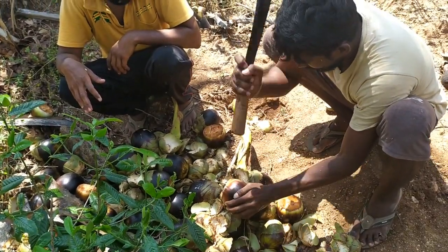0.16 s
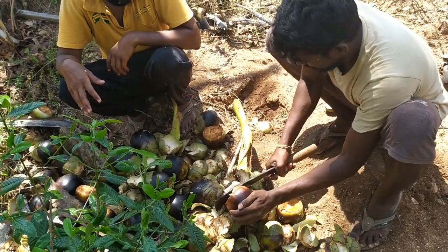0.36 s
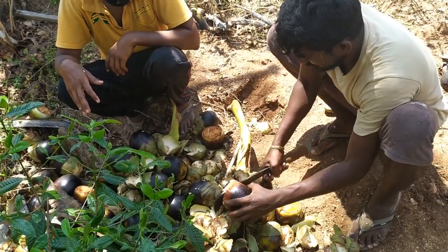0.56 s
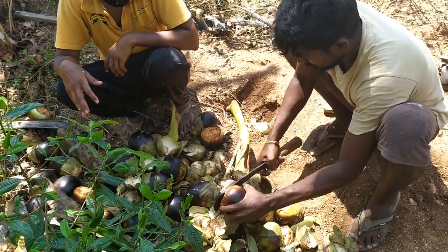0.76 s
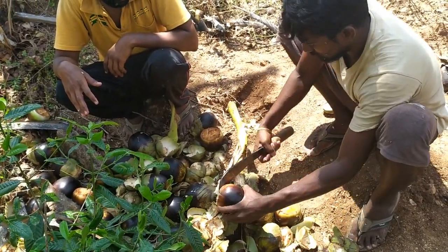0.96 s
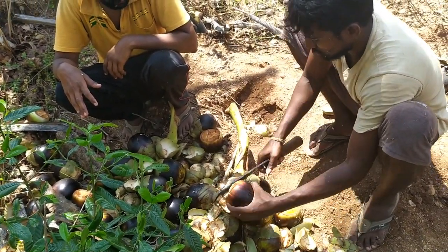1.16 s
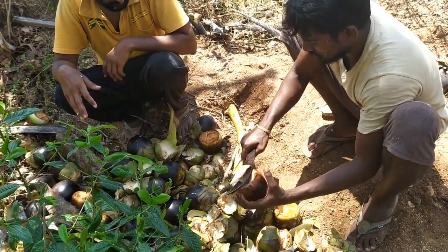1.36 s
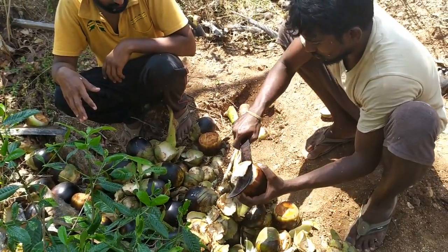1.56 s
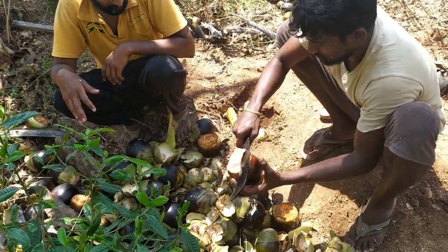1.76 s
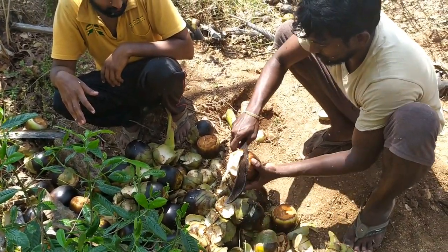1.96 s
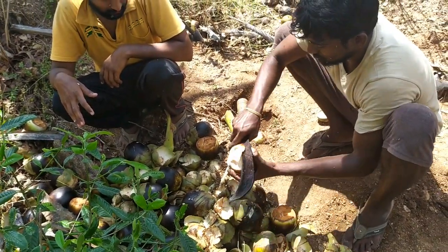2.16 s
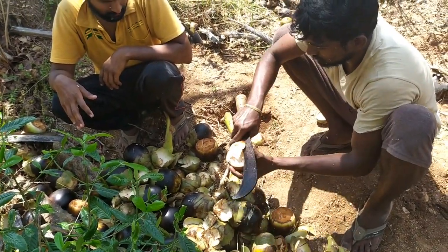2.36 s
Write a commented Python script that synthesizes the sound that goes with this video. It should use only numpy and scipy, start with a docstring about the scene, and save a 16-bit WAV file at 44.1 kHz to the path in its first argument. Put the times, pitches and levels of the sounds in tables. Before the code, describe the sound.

Single loud crunching chop of a heavy blade into a fibrous fruit near the start, short dry outdoor echo, then much quieter scraping, snapping husk and shuffling on sand, right of centre, over faint rumble and hiss.

```python
"""A machete chops once into a tough fruit held on sandy ground, outdoors, mostly on the right.
Crack impulses ring modes of blade and fruit; dense grains make torn fibres, then spray; falling sines thud.
Grain strokes then scrape along the cut, with ringing husk ticks and hollow knocks of the handled fruit.
Beneath: grainy shuffling on sand, a noise-tail echo, and coloured noise as quiet outdoor rumble and hiss."""
import sys
import numpy as np
from scipy import signal
from scipy.fft import rfft, irfft
from scipy.io import wavfile

SR = 44100
rng = np.random.default_rng(int(sys.argv[2]) if len(sys.argv) > 2 else 0)


def unload_audio(sound):
    """Save the sound as a 16-bit wav file, at the path given as the first command line argument."""
    columns = np.transpose(np.atleast_2d(sound))
    # keep every value between -1 and 1, then stretch to whole-number steps
    steps = np.round(np.clip(columns, -1, 1) * 32767)
    wavfile.write(sys.argv[1], SR, steps.astype(np.int16))


N = 105840

# Spectra are relative: colour() normalises their power. Event levels are before left-right placement.
# outdoor air spectrum: f/Hz, level/dB
AIR_SPECTRUM = [(20, -27), (32, -13), (48, 1), (70, -6), (97, 1), (135, -12), (190, -15), (300, -20),
                (450, -22.5), (800, -27), (1500, -32), (2100, -27), (2650, -23), (3300, -26.5), (4100, -29),
                (5200, -21.5), (6200, -27.5), (7200, -33.5), (11000, -34), (16000, -41.5)]
# air width: f/Hz, side re mid/dB
AIR_SIDE = [(50, -5.5), (110, -5), (400, -3.5), (1200, 1.5), (5000, -0.5), (15000, 0.5)]
# air balance: f/Hz, left re right/dB
AIR_BALANCE = [(60, -1), (400, -3), (1200, -3), (2500, -11.5), (4400, -2.5), (12000, -1)]
AIR_DB = -65.5

# dull shuffling on sand: start t/s, level/dB, rise/s, hold/s, release/s
SHUFFLES = [(0.001, -66.5, 0.11, 0.031, 0.12), (0.316, -60, 0.0023, 0.034, 0.055),
            (0.584, -64.5, 0.0059, 0.015, 0.05)]
# shuffle spectrum: f/Hz, level/dB
SHUFFLE_SPECTRUM = [(100, -14), (250, -9.5), (430, -0.5), (750, -9.5), (1300, -17.5), (4000, -24.5),
                    (12000, -43)]

# echo spectrum (absolute gain): f/Hz, gain/dB
ECHO_GAIN = [(60, -7.5), (300, -1), (1000, 7), (3000, -2), (7000, -2), (16000, 0.5)]
ECHO_DELAY_S, ECHO_SIDE_RE_MID_DB = 0.0054, 3
NEAR_DB, NEAR_T60_S = -23.5, 0.11
FAR_DB, FAR_T60_S = -27.5, 0.24

# edge breaking husk layers: t/s, crack/dB, blade ring/dB (before BLADE_TRIM_DB), push on fruit/dB
BREAKS = [(0.22701, -17, -4, -34), (0.22781, -8, -13, -25), (0.23102, -7, -22, -16),
          (0.23416, -5.5, -9, -2), (0.2358, -7, -17, -15), (0.23695, -23, -2.5, 3)]
# blade modes in the husk: f/Hz, level/dB, t60/s
BLADE_MODES = [(1786, -27, 0.048), (2057, -26, 0.034), (2245, -22, 0.03), (2700, 2, 0.016),
               (3094, -21, 0.04), (3646, -15, 0.024), (3880, -7, 0.012), (4078, -18, 0.048),
               (4613, -23, 0.025), (5252, -23, 0.033), (6811, -27, 0.027)]
# whole-fruit modes: f/Hz, level/dB, t60/s
FRUIT_MODES = [(228, -32, .045), (418, -26, .032), (520, -35, .024), (837, -37.5, .06), (1376, -39, .02)]
# splitting husk spectrum: f/Hz, level/dB
CRACK_SPECTRUM = [(60, -30), (300, -24), (650, -15), (1080, -27), (1700, -14), (2300, -7), (2650, -2),
                  (3200, -5), (4000, -5), (5300, -5), (6200, -13), (8400, -14), (9100, -21), (14000, -25),
                  (16000, -47)]
BLADE_TRIM_DB, BLADE_LOW_CUT_HZ = -8, 1000
CUT_START_S, CUT_LENGTH_S = 0.227, 0.0105
TEAR_DB, TEAR_PER_S, TEAR_DECAY_S = -22, 9000, 0.003

# spray spectrum: f/Hz, level/dB
SPRAY_SPECTRUM = [(500, 1), (2000, -8), (2800, -1), (4500, -6), (7000, -8), (12000, -16.5), (16000, -27.5)]
SPRAY_DB, SPRAY_PER_S, SPRAY_DECAY_S = -49.5, 3200, 0.031

# fruit pressed or dropped on soil: t/s, level/dB, starting f/Hz, time to half pitch/s, rise/s, decay/s
THUDS = [(0.2388, -10.5, 160, 0.012, 0.019, 0.0084), (0.6413, -37.5, 680, 0.0008, 0.00018, 0.012),
         (0.774, -26, 97, 0.065, 0.025, 0.0087), (1.9948, -50, 219, 0.0028, 0.0019, 0.0062)]

# blade strokes along the cut: start t/s, level/dB, rise/s, hold/s, release/s, grating re stroke/dB
SCRAPES = [(0.274, -65, 0.019, 0.14, .05, -5), (0.7, -52, 0.069, 0.0066, 0.023, -10),
           (0.786, -53.5, 0.03, 0.037, 0.057, -6), (0.899, -66.5, 0.029, 0.03, 0.02, -9.5),
           (0.966, -60.5, 0.063, 0.023, 0.18, -7), (1.50, -73, 0.057, 0.034, 0.025, -30),
           (1.588, -59.5, 0.027, 0.017, 0.038, -44), (1.726, -60, 0.02, 0.0095, 0.068, -16),
           (1.966, -69, 0.019, 0.047, 0.21, -6), (2.124, -65.5, 0.016, 0.024, 0.074, -10.5),
           (2.205, -69, 0.031, 0.03, 0.17, -8.5)]
# blade hiss spectrum: f/Hz, level/dB
SCRAPE_SPECTRUM = [(800, -31.5), (1900, -25.5), (2650, -0.5), (3400, -5), (4200, -9.5), (5500, -10.5),
                   (7200, -18), (10000, -25), (16000, -36)]
# grating spectrum, strongest near 2.3 kHz: f/Hz, level/dB
GRATE_SPECTRUM = [(100, -24), (400, 1.5), (900, -3.5), (1500, 5), (2300, 13), (3500, -25.5), (8000, -42.5)]
SCRAPE_PER_S, GRATE_PER_S, SCRAPE_SPREAD_DB = 2600, 1900, 2.7
CATCH_PER_S, CATCH_DB = 110, 1.4

# husk and blade ticks: t/s, ring level/dB, f/Hz, t60/s
TICKS = [(0.288, -35, 3110, 0.0089), (0.4163, -36, 2640, 0.0036), (0.42, -52, 2220, 0.0061),
         (.4326, -39.5, 3000, .012), (0.4747, -48, 3340, 0.0056), (.4793, -37.5, 3100, 0.0045),
         (.5395, -46, 2780, 0.01), (.592, -47, 3250, 0.013), (.692, -52.5, 2480, .018),
         (0.7516, -44, 7060, 0.0042), (0.7583, -46, 2620, 0.036), (.762, -50, 4040, 0.027),
         (0.7984, -41, 2680, 0.014), (0.8499, -43, 2400, 0.007), (.8538, -40, 3450, .009),
         (0.8766, -41, 2260, 0.018), (1.06, -46, 2570, .02), (1.115, -50, 3020, 0.0073),
         (1.1175, -48, 4300, 0.01), (1.289, -48, 2360, 0.0049), (1.3718, -45.5, 2690, 0.012),
         (1.9928, -35.5, 2560, 0.0057), (2.0138, -51, 4340, .008), (2.042, -50.5, 2580, 0.0075),
         (2.078, -51.5, 2900, 0.016), (2.093, -53.5, 2250, 0.02), (2.155, -54, 2780, 0.018),
         (2.1835, -48.5, 2800, .01), (2.2738, -48, 2800, 0.012), (2.316, -53, 3140, 0.0098)]
# breaking-fibre spectrum: f/Hz, level/dB
SNAP_SPECTRUM = [(150, -11), (700, -2.5), (1500, 3), (3200, 3), (6500, -14), (16000, -26.5)]
SNAP_RE_RING_DB, SNAP_DECAY_S = -10.5, 0.0016
# hollow knocks of the handled fruit: t/s, level/dB, f/Hz, t60/s
KNOCKS = [(0.4325, -52.5, 410, 0.028), (0.5975, -50.5, 848, 0.02), (0.853, -49, 1490, 0.03),
          (0.903, -48.5, 1000, 0.021)]

# balance of work and echo: f/Hz, left re right/dB
WORK_BALANCE = [(100, 0), (380, 1), (700, -3.5), (1300, -8.5), (2500, -13), (4300, -5.5), (8000, -11.5),
                (15000, -13)]
# phase by which the left microphone trails: f/Hz, lag/rad
LEFT_LAG = [(60, 0.49), (400, 0.17), (1500, 0.763), (3000, 0.24), (7000, 1.0)]
LOW_CUT_HZ, TOP_HZ = 30, 15900


def amp(db):
    """dB to amplitude."""
    return 10 ** (np.asarray(db) / 20)


def unit(x):
    """Scale to unit RMS."""
    return x / np.sqrt(np.mean(x ** 2))


def since(start_s):
    """Seconds since a moment, zero before it."""
    return np.maximum(np.arange(N) / SR - start_s, 0)


def bins_hz():
    """Bin frequencies of a double-length transform."""
    return np.arange(N + 1) * SR / (2 * N)


def gains(points):
    """Amplitude gain per bin, dB interpolated over log frequency."""
    hz, db = np.array(points, float).T
    return amp(np.interp(np.log(bins_hz() + 1), np.log(hz), db))


def colour(x, points):
    """Minimum-phase filter of the given spectrum, unit power gain."""
    cepstrum = irfft(np.log(unit(gains(points))))
    cepstrum[1:N] *= 2  # fold to a causal response
    cepstrum[N + 1:] = 0
    response = np.exp(rfft(cepstrum))
    return irfft(rfft(x, 2 * N) * response)[..., :N]


def place(x, balance):
    """Set the left-right level ratio band by band."""
    ratio = gains(balance)
    left_right = np.array([2 * ratio, 2 + 0 * ratio]) / (1 + ratio)
    return irfft(rfft(x, 2 * N) * left_right)[:, :N]


def ring(start_s, modes):
    """Modes struck at one moment: exponentially decaying sines."""
    t = since(start_s)
    out = 0
    for hz, db, t60_s in modes:
        fade = np.exp(-np.log(1000) * t / t60_s)
        out = out + amp(db) * np.sin(2 * np.pi * hz * t) * fade
    return out


def swell(start_s, rise_s, hold_s, release_s):
    """Linear rise, hold and release."""
    return np.interp(since(start_s), np.cumsum([0, rise_s, hold_s, release_s]), [0, 1, 1, 0])


def grains(rate_per_s, spread_db):
    """Random impulses of uneven size and sign, unit RMS."""
    size = amp(spread_db * np.minimum(rng.exponential(size=N), 5))
    hits = rng.random(N) < rate_per_s / SR
    return unit(hits * size * rng.choice([-1, 1], N))


def wide_noise(side_db):
    """Stereo noise: a shared part plus an opposed part at side_db re shared."""
    mid, side = rng.standard_normal((2, N))
    return mid + amp(side_db) * np.array([side, -side])


def air():
    """Quiet outdoor rumble and hiss: coloured noise, its width and balance set by band."""
    mid, side = colour(rng.standard_normal((2, N)), AIR_SPECTRUM)
    side = irfft(rfft(side, 2 * N) * gains(AIR_SIDE))[:N]
    return amp(AIR_DB) * place(np.array([mid + side, mid - side]), AIR_BALANCE)


def shuffles():
    """Weight shifting on sand: dull swells of uneven grains."""
    force = 0
    for start_s, db, rise_s, hold_s, release_s in SHUFFLES:
        force = force + amp(db) * swell(start_s, rise_s, hold_s, release_s)
    return colour(force * grains(2000, spread_db=5.0), SHUFFLE_SPECTRUM)


def surroundings(x):
    """Quick scatter from ground and bodies plus a faint vegetation tail: decaying stereo noise."""
    t = since(ECHO_DELAY_S)
    tail = 0
    for db, t60_s in (NEAR_DB, NEAR_T60_S), (FAR_DB, FAR_T60_S):
        fade = (t > 0) * np.exp(-np.log(1000) * t / t60_s)
        fade = fade / np.sqrt(np.sum(fade ** 2))  # unit energy
        tail = tail + amp(db) * fade * wide_noise(ECHO_SIDE_RE_MID_DB)
    return irfft(rfft(x, 2 * N) * rfft(tail, 2 * N) * gains(ECHO_GAIN))[:, :N]


def husk_breaks():
    """Husk layers crack as impulses and ring the modes of blade and fruit."""
    cracks, blade, fruit = np.zeros((3, N))
    for start_s, crack_db, blade_db, fruit_db in BREAKS:
        cracks[int(start_s * SR)] += amp(crack_db)
        blade += amp(blade_db + BLADE_TRIM_DB) * ring(start_s, BLADE_MODES)
        fruit += amp(fruit_db) * ring(start_s, FRUIT_MODES)
    # the blade rings carry little bass
    blade = signal.lfilter(*signal.butter(1, BLADE_LOW_CUT_HZ, "high", fs=SR), blade)
    return -blade - fruit - colour(cracks, CRACK_SPECTRUM)


def tearing():
    """Fibres tear during the cut: dense grains, steady then dying away."""
    after = since(CUT_START_S + CUT_LENGTH_S)
    force = amp(TEAR_DB) * (since(CUT_START_S) > 0) * np.exp(-after / TEAR_DECAY_S)
    return -colour(force * grains(TEAR_PER_S, spread_db=-0.5), CRACK_SPECTRUM)


def spray():
    """Splinters and juice after the cut: decaying uneven grains."""
    after = since(CUT_START_S + CUT_LENGTH_S)
    level = amp(SPRAY_DB) * (after > 0) * np.exp(-after / SPRAY_DECAY_S)
    return colour(level * grains(SPRAY_PER_S, spread_db=3.0), SPRAY_SPECTRUM)


def thuds():
    """Soft blows into soil: sines dropping in pitch as they die."""
    out = 0
    for start_s, db, hz, half_pitch_s, rise_s, decay_s in THUDS:
        t = since(start_s)
        phase = 2 * np.pi * hz * half_pitch_s * np.log1p(t / half_pitch_s)  # f = hz / (1 + t / half_pitch_s)
        envelope = (1 - np.exp(-t / rise_s)) * np.exp(-t / decay_s)
        out = out + amp(db) * np.sin(phase) * envelope
    return out


def catching():
    """Uneven drag as the edge catches and slips: interpolated random gain."""
    steps = np.arange(N) / SR * CATCH_PER_S
    db = CATCH_DB * rng.standard_normal(int(steps[-1]) + 2)
    return amp(np.interp(steps, np.arange(len(db)), db))


def scrapes():
    """Steel drags over fibres: dense slips hiss on the blade and grate in the fruit."""
    hiss, grate = 0, 0
    for start_s, db, rise_s, hold_s, release_s, grate_db in SCRAPES:
        force = amp(db) * swell(start_s, rise_s, hold_s, release_s)
        hiss = hiss + force
        grate = grate + force * amp(grate_db)
    hiss = hiss * catching() * grains(SCRAPE_PER_S, SCRAPE_SPREAD_DB)
    grate = grate * grains(GRATE_PER_S, SCRAPE_SPREAD_DB)
    return colour(hiss, SCRAPE_SPECTRUM) + colour(grate, GRATE_SPECTRUM)


def ticks():
    """Single fibres snap as short noise bursts, each with a brief ring at its own pitch."""
    snap, rung = 0, 0
    for start_s, db, hz, t60_s in TICKS:
        t = since(start_s)
        snap = snap + amp(db + SNAP_RE_RING_DB) * (t > 0) * np.exp(-t / SNAP_DECAY_S)
        rung = rung + ring(start_s, [(hz, db, t60_s)])
    return rung + colour(snap * rng.choice([-1, 1], N), SNAP_SPECTRUM)


def knocks():
    """Hollow knocks of the handled fruit: one decaying mode each."""
    return sum(ring(start_s, [(hz, db, t60_s)]) for start_s, db, hz, t60_s in KNOCKS)


def scene():
    """Work and echo, phase-lagged at the left microphone, over outdoor air."""
    chop = husk_breaks() + tearing() + spray()
    work = shuffles() + chop + thuds() + scrapes() + ticks() + knocks()
    left, right = place(work + surroundings(work), WORK_BALANCE)
    lag_rad = np.interp(bins_hz(), *np.array(LEFT_LAG).T)
    left = irfft(rfft(left, 2 * N) * np.exp(-1j * lag_rad))[:N]
    return np.array([left, right]) + air()


def record(dry):
    """The recorder drops the deepest bass and cuts the top."""
    low_cut = signal.butter(2, LOW_CUT_HZ, "high", fs=SR, output="sos")
    top_cut = signal.ellip(8, 0.2, 70, TOP_HZ, fs=SR, output="sos")  # ripple/dB, stopband/dB
    return signal.sosfilt(top_cut, signal.sosfilt(low_cut, dry))


dry = scene()
out = record(dry)
unload_audio(out)
```